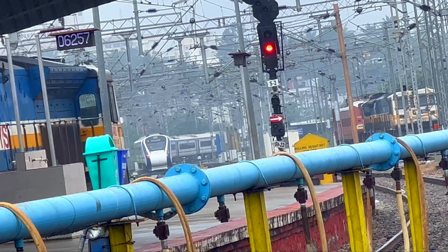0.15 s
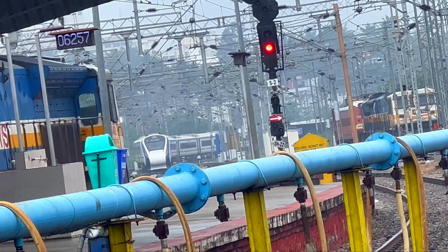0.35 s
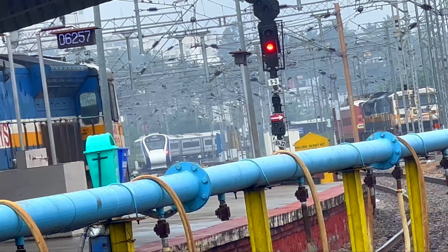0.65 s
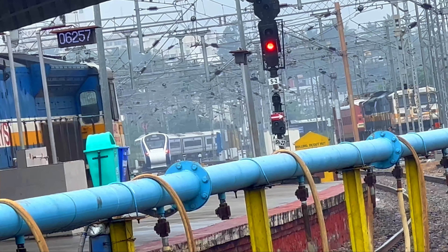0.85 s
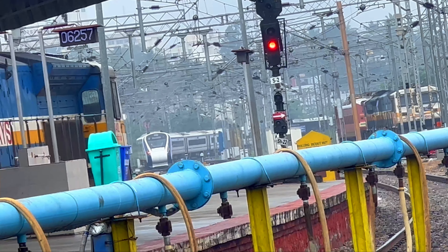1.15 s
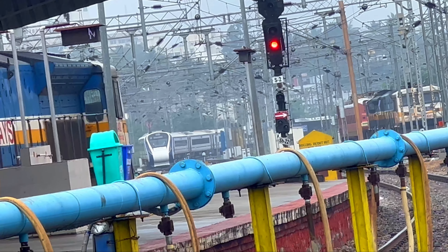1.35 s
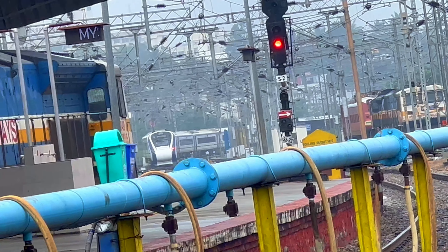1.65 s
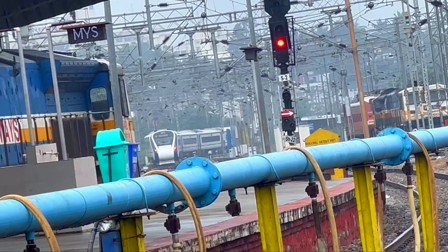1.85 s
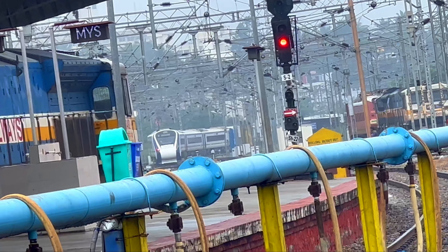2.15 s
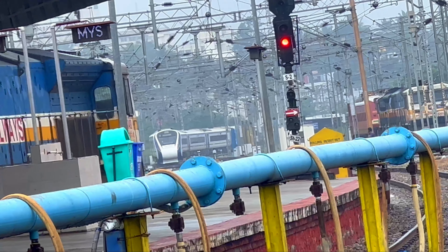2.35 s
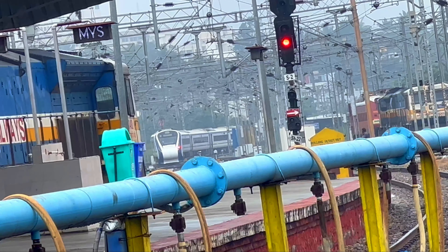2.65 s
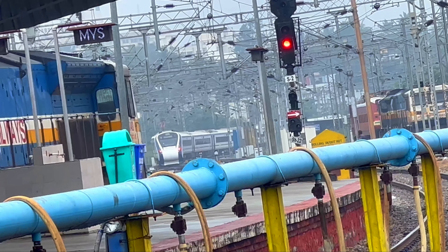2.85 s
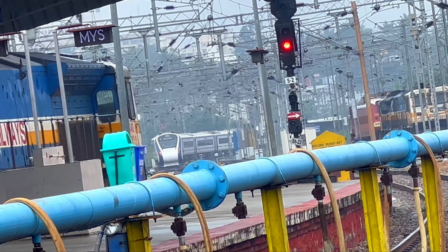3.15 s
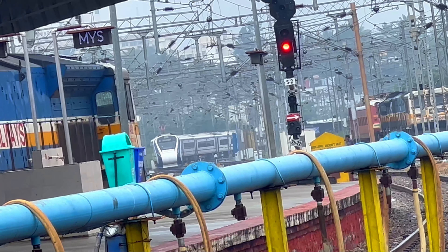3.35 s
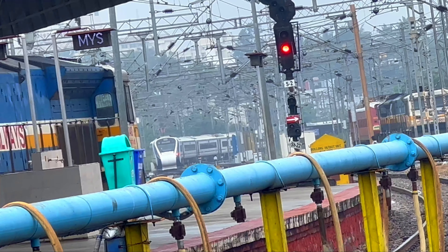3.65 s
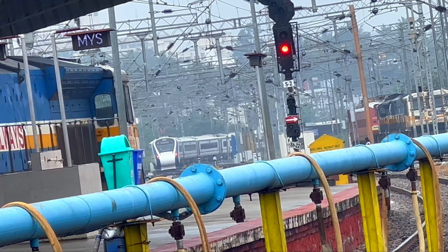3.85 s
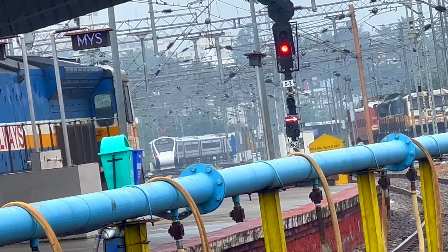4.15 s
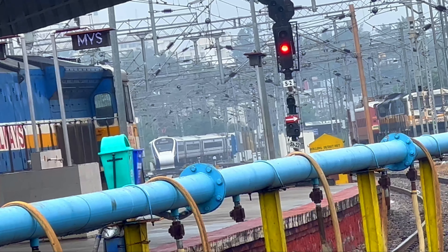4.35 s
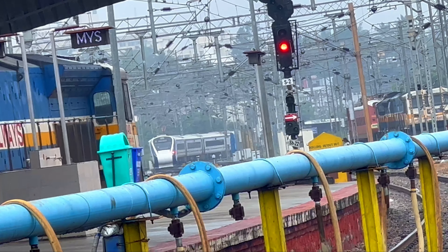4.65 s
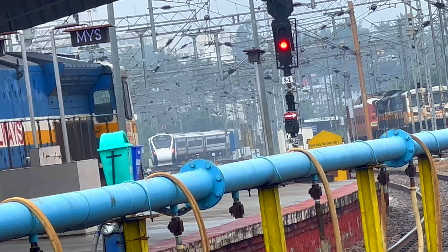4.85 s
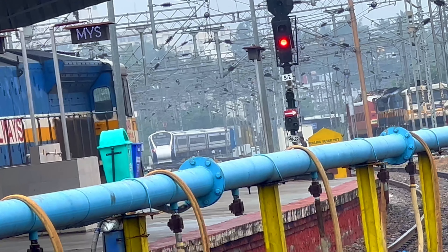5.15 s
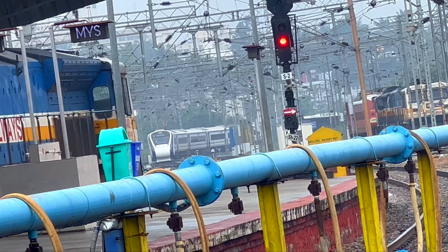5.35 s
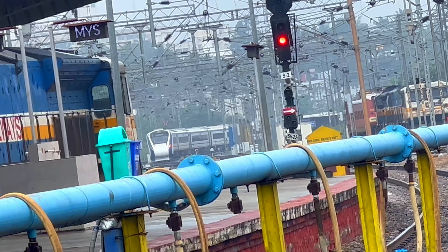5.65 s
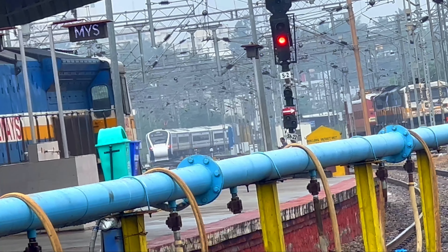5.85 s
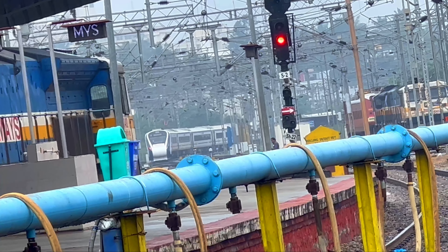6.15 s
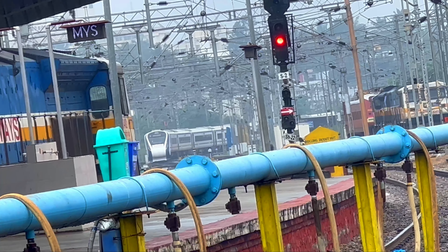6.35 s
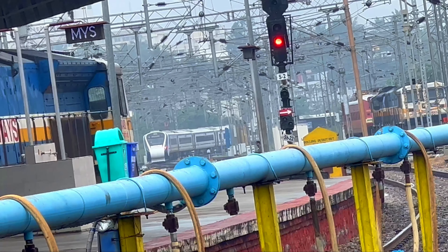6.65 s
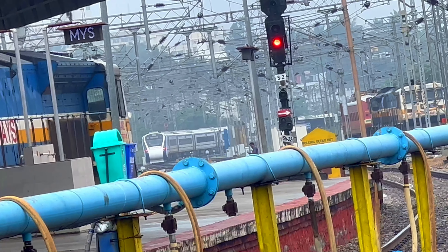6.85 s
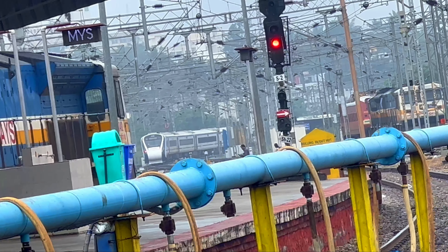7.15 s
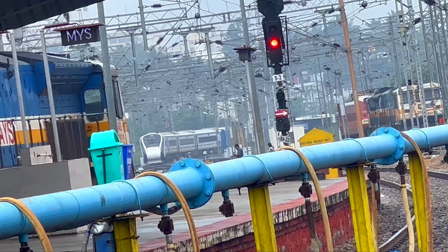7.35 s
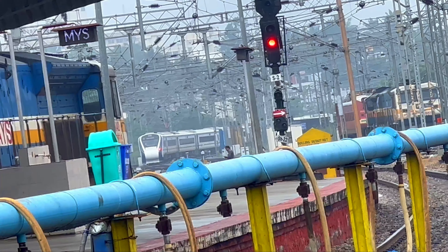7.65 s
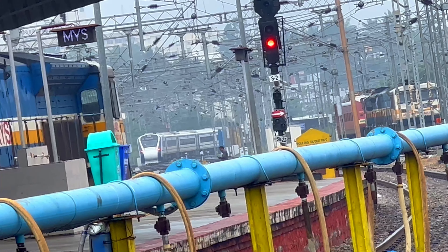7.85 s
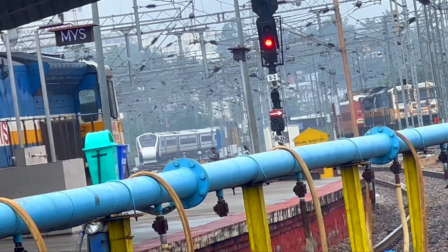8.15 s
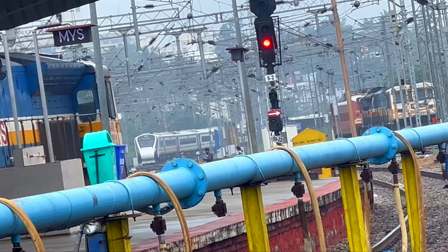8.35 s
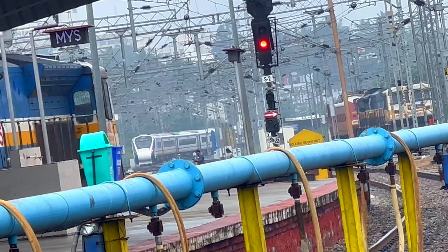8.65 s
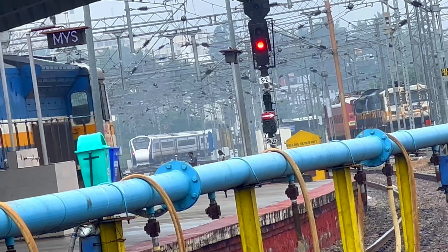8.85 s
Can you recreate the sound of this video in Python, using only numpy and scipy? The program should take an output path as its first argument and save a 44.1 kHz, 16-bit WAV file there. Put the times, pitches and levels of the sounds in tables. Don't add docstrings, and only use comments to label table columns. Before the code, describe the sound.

A steady throbbing low rumble with high machine whines, faint far hisses and a chirp, then a sharp loud air release amid wind buffeting.

```python
import sys
import numpy as np
from scipy import signal
from scipy.fft import rfft, irfft, next_fast_len
from scipy.io import wavfile
from scipy.ndimage import uniform_filter1d, map_coordinates

SR = 44100
rng = np.random.default_rng(int(sys.argv[2]) if len(sys.argv) > 2 else 0)


def to_wav(s):
    ch = np.atleast_2d(s).T
    pcm = np.round(np.clip(ch, -1, 1) * 32767)
    wavfile.write(sys.argv[1], SR, pcm.astype(np.int16))


def boost(x):
    u = np.asarray(x, float) / 20
    return 10 ** u


N = 396459
CYCLE_HZ = 8.575
BEAT_HZ = CYCLE_HZ / 2

# (time [s], change [%])
SPEED = [(0, 0), (5.5, -.05), (6.4, -.3), (6.9, -.85), (7.8, -.7), (9, -.15)]


def unit(x):
    return x / np.sqrt(np.mean(x ** 2) + 1e-20)


def along(points, hz):
    f, v = np.transpose(points)
    return np.interp(np.log(hz + 1), np.log(f + 1), v)


def curves(rows):
    s, *cols = np.transpose(rows)
    return [np.interp(np.arange(N) / SR, s, c) for c in cols]


def wobble(rate):
    knots = rng.standard_normal(int(N * rate / SR) + 4)
    return map_coordinates(knots, [np.arange(N) * rate / SR])


def filtered(x, response):
    m = next_fast_len(N + SR // 2)
    return irfft(rfft(x, m) * response(np.fft.rfftfreq(m, 1 / SR)), m)[..., :N]


def spectrum(points):
    closed = [(points[0][0] / 2, -90), *points, (points[-1][0] * 1.1, -120)]
    return lambda hz: boost(along(closed, hz))


def rush(gain, patchy_db):
    z = signal.stft(rng.standard_normal((2, N)), nperseg=512)[2]
    field = rng.standard_normal(z.shape[1:])
    field = uniform_filter1d(uniform_filter1d(field, size=6, axis=0), size=14, axis=1)
    patchy = signal.istft(z * boost(patchy_db * unit(field)), nperseg=512)[1][:, :N]
    pair = filtered(patchy, gain)
    return pair / np.sqrt(np.mean(pair[0] ** 2))


def flicker(hz, wander_hz, rate):
    turn = np.exp(2j * np.pi * np.cumsum(hz + wander_hz * wobble(7)) / SR)
    paths = [wobble(rate) + 1j * wobble(rate) for _ in range(2)]
    return np.real(turn * [1.29 + 0.79 * paths[0], paths[1]])


def shaft_time():
    return np.cumsum(1 + curves(SPEED)[0] / 100) / SR


def engine():
    # (frequency [Hz], density [dB per Hz])
    rumble = [(13, -47), (22, -12), (38, -7.5), (59, 1.5), (86, 1), (106, -3), (115, -14), (124, -32),
              (162, -43), (200, -26), (260, -51), (440, -120)]
    # (multiple of the beat [1], level [dB])
    orders = [(8, -12), (11, -9), (13, -10), (15, -8), (16, 0), (17, -1.5), (18, -1.5), (19, -1), (21, -3),
              (22, 0), (23, 4), (24, -8)]
    drone_db, order_db, order_sway_db = -29, -8.5, 1.5
    weak_firing_s, dip_db, dip_s, rebound_db = .165, 9, .022, 2.5
    t = shaft_time()
    drone = boost([[-8], [-4.5]]) * rush(spectrum(rumble), patchy_db=.5)
    for multiple, db in orders:
        order_gain = boost(order_db + db + order_sway_db * wobble(1.5))
        drone[0] += order_gain * np.sin(2 * np.pi * (multiple * BEAT_HZ * t + rng.random()))

    power = uniform_filter1d(uniform_filter1d(drone[0] ** 2, size=2400), size=2400)
    level = np.sqrt(np.abs(power))
    since_s = (t - weak_firing_s) % (1 / BEAT_HZ)
    gap = np.exp(-(np.minimum(since_s, 1 / BEAT_HZ - since_s) / dip_s) ** 2)
    throb_db = rebound_db * np.sin(2 * np.pi * BEAT_HZ * since_s) / 2
    throb_db -= dip_db * gap * np.clip(1 + .5 * wobble(3), 0, 2)
    return boost(drone_db + throb_db + .8 * wobble(6)) * drone / (level + 0.14)


def exhaust():
    firings = [1, .1, .55, .25, .8, .05, .45, .2]
    # (multiple of the cycle [1], level [dB])
    duct_orders = [(77, -52), (79, -52), (81, -51.5), (83, -55), (85, -57), (87, -55.5)]
    duct_hz, width_hz, jitter_s = 688, 130, .00012
    shaft = shaft_time()
    count = int(N / SR * CYCLE_HZ * len(firings))
    chance = rng.standard_normal((count, 2))
    firing_s = np.arange(count) / CYCLE_HZ / len(firings) + jitter_s * chance[:, 0]
    at = np.interp(firing_s, shaft, np.arange(N))
    strength = np.resize(firings, count) * boost(1.7 * chance[:, 1])
    pulses = np.bincount(at.astype(int), strength, N)
    duct = lambda f: (1j * f * width_hz / (duct_hz ** 2 - f * f + 1j * f * width_hz)) ** 2
    ring = boost(-52) * unit(filtered(pulses, duct))
    for k, (multiple, db) in enumerate(duct_orders):
        phase = 2 * np.pi * multiple * CYCLE_HZ * shaft + np.pi / 2 * (k % 2) + .3 * wobble(3)
        ring += boost(db + 1.6 * wobble(2.5)) * np.sin(phase)
    return np.array([ring, np.roll(ring, 1500)])


def machines():
    # (frequency [Hz], level [dB], pitch wander [Hz], flicker rate [per s])
    tones = [(339, -57, 1.1, 7), (412, -57, 2.5, 9), (433, -57, 1.5, 9), (1647, -68, 3, 20),
             (1935, -64, 3, 18), (2561, -62, 2.5, 24), (2590, -69, 1.5, 10), (3005, -63, 3, 20),
             (3755, -70, 1.5, 15), (3955, -69, 4, 35), (4861, -82, 8, 25), (7590, -76, 15, 60)]
    # (frequency [Hz], pitch wander [Hz], flicker rate [per s], share of speed change [0-1])
    whine_tones = [(2434, 4, 32, 1), (3797, 4.5, 55, 1), (3992, 3.5, 44, 0)]
    # (level [dB], drift [dB per s])
    whine_levels = [(-60, 0.01), (-58, .25), (-56, -.5)]
    shake_hz, shake_share, beat_shake_share = 6.15, .0022, .0018
    t, shaft = np.arange(N) / SR, shaft_time()
    speed_percent = curves(SPEED)[0]
    out = sum(boost(db) * flicker(hz, wander_hz, rate) for hz, db, wander_hz, rate in tones)
    for (db, drift), (hz, wander_hz, rate, share) in zip(whine_levels, whine_tones):
        beat = np.cos(2 * np.pi * (BEAT_HZ * shaft + rng.random()))
        rock = shake_share * np.cos(2 * np.pi * shake_hz * t - .4) + beat_shake_share * beat
        whine_hz = hz * (1 + share * speed_percent / 100 + rock)
        whine_db = db + 3.26 + drift * t + 1.2 * wobble(4) + .8 * beat
        out += boost(whine_db) * flicker(whine_hz, wander_hz, rate)
    return out


def vents():
    # (frequency [Hz], density [dB per Hz])
    jet = [(400, -17), (800, -4.5), (1500, -3), (3000, 0.5), (6400, 1.5), (8000, -0.5), (9000, -1.5),
           (12000, -7), (13000, -13), (15500, -15)]
    # (time [s], level [dB], dullness [dB per octave])
    blast = [
        (6.42, -74, 0),
        (6.46, -48, 0),
        (6.504, -44, 1),
        (6.53, -36, 3.5),
        (6.574, -34, 3),
        (6.59, -26, .5),
        (6.742, -30.5, 0),
        (6.932, -43, 3.5),
        (7.35, -67, 6),
    ]
    # (peak time [s], level [dB], rise [s], fall [s], dullness [dB per octave])
    far_vents = [(.7, -50.5, .13, .36, 3), (3.09, -62, .05, .06, 3), (3.37, -62, .2, .05, 3),
                 (3.87, -62, .05, .25, 2), (4.43, -48, .36, .25, 2.8), (6.215, -58, .06, .14, 3),
                 (7.72, -58, .06, .09, 3), (7.885, -63, .04, .12, 2)]
    # (time [s], peak level [dB])
    spits = [(7.66, -38), (7.6684, -37), (7.6789, -39), (7.7244, -45)]
    edge_db, rise_curve, fall_curve = 20, 1.8, 1.5
    dulls_per_db = .17
    t = np.arange(N) / SR
    bright = rush(spectrum(jet), patchy_db=1.3) * boost(.9 * wobble(45))
    dull = filtered(bright, lambda hz: np.log2((hz + 1) / 6000) / 8)

    db, tilt = curves(blast)
    is_open = (t > blast[0][0]) * (t < blast[-1][0])
    out = is_open * boost(db + 2.0) * (bright - np.clip(tilt, -3, 6) * dull)

    for s, db, rise_s, fall_s, tilt in far_vents:
        away_s = np.abs(t - s)
        loss_db = edge_db * np.where(t < s, (away_s / rise_s) ** rise_curve, (away_s / fall_s) ** fall_curve)
        dullness = np.clip(tilt + dulls_per_db * loss_db, -3, 5.5)
        out += boost(db + 2.0 - loss_db) * (bright - dullness * dull)

    spit = np.zeros(N)
    for s, db in spits:
        peak_s = s + .003
        slope_s = np.where(t > peak_s, .05, .012)
        spit += boost(db - 7 - 60 * np.abs(t - peak_s) / slope_s)
    band = lambda hz: 1 / (1 + (4500 / (hz + 1)) ** 6) / (1 + (hz / 12500) ** 4)
    return out + spit * filtered(bright, band)


def wind():
    # (peak time [s], flap level [dB], length [s], thump level [dB])
    puffs = [(1.38, -42, .03, -26), (1.507, -36, .025, -34), (2.815, -32, .03, -20), (3.475, -33, .04, -24),
             (3.6, -40, .03, -25), (3.696, -35, .027, -34), (4.06, -42, .03, -25), (4.445, -27, .027, -22),
             (4.625, -29, .045, -18), (4.825, -30.5, .04, -30), (4.868, -28, .03, -25),
             (5.075, -26, .026, -17), (5.161, -22, .05, -19), (5.195, -27.5, .027, -17),
             (5.345, -23.5, .036, -16), (5.385, -26, .026, -21), (5.525, -23, .023, -16),
             (5.611, -24.5, .025, -30), (5.798, -34, .03, -38), (5.961, -36, .03, -28),
             (6.07, -33, .044, -23), (6.203, -9.5, .024, -19), (6.275, -18.5, .037, -12),
             (6.507, -22.5, .027, -18), (8.337, -30.5, .03, -23), (8.433, -32, .03, -25),
             (8.525, -25.5, .06, -26), (8.7, -36, .03, -20), (8.85, -31.5, .03, -28),
             (8.944, -31, .024, -11)]
    flap_top_hz, flap_opens_hz, thump_hz, thump_longer = 170, 185, 76, .8
    out = np.zeros((2, N + SR))
    t = np.arange(-SR // 10, SR // 10) / SR
    hz = np.fft.rfftfreq(len(t), 1 / SR)
    for s, db, length_s, thump_db in puffs:
        top_hz = flap_top_hz + flap_opens_hz * boost(db + 8.5)
        band = 1 / (hz + 60) / (1 + (hz / top_hz) ** 8) / (1 + (105 / (hz + 1)) ** 8)
        noise = irfft(rfft(rng.standard_normal((2, len(t)))) * band, len(t))
        flap = np.exp(-(t / length_s) ** 2 * 2) * noise
        flap = flap / np.abs(flap[0]).max()

        pitch, turn = rng.standard_normal(2)
        phase = 2 * np.pi * thump_hz * (1 + .12 * pitch) * t + 2 * turn + [[0], [np.pi / 2]]
        thump = np.exp(-(t / length_s / thump_longer) ** 2 * 2) * np.cos(phase)
        puff = boost(db - 0.5) * flap * [[1], [1.4]] + boost(thump_db + 0.4) * thump * [[1], [1.6]]
        start = round(s * SR) - len(t) // 2
        out[:, start:start + len(t)] += puff
    return out[:, :N]


def bird():
    # (time [s], length [s], from [Hz], towards [Hz], level [dB])
    chirps = [
        (2.88, .22, 523, 519, -49),
        (3.832, .028, 4700, 5300, -53),
        (3.86, .034, 3700, 3200, -51),
        (4.235, .11, 2800, 3410, -47),
        (4.546, .14, 6800, 3950, -51.5),
    ]
    out, t = np.zeros(N), np.arange(N) / SR
    for s, length_s, from_hz, to_hz, db in chirps:
        u = np.clip((t - s) / length_s, 0, 1)
        hz = to_hz + (from_hz - to_hz) * np.exp(-3.7 * u)
        phase = 2 * np.pi * np.cumsum(hz) / SR
        swell = np.sin(np.pi * u ** .65) ** .8 * (u < 1)
        second = .55 * (hz > 1000) * (hz < 3700) * np.sin(2 * phase)
        out += boost(db + 1.8 * wobble(90)) * swell * (.8 * np.sin(phase) + second)
    return out * np.array([[1], [0]])


def yard():
    # (frequency [Hz], density [dB per Hz])
    roll = [(120, -6.5), (170, -14.5), (300, -13.5), (560, -14), (800, -17), (1100, -22), (1800, -25.5),
            (2300, -27.5), (3000, -29.5), (3600, -31.5), (4200, -32), (4600, -58)]
    # (frequency [Hz], density [dB per Hz])
    far_air = [(3000, -30), (4300, 0.5), (6000, -4.5), (8300, -6), (9500, -11.5), (11500, -21),
               (13500, -30.5), (15500, -30)]
    # (time [s], level [dB])
    leak = [(0, -63), (.55, -63.5), (1.05, -59.5), (4, -59.5), (4.7, -62), (6.4, -63), (7.4, -61.5),
            (9, -63)]
    # (frequency [Hz], width [Hz], level [dB])
    hums = [(690, 75, -47.5), (2082, 56, -57), (1387, 104, -59.5), (210, 29, -60)]
    # (frequency [Hz], depth [0-1])
    beats = [(25.7, .15), (34.3, .5), (42.9, .15)]
    roll_db = -41.6 + .12 * np.arange(N) / SR
    air_db = curves(leak)[0]
    out = boost(roll_db) * rush(spectrum(roll), patchy_db=0.8)
    out += boost(air_db + 0.22 * wobble(9)) * rush(spectrum(far_air), patchy_db=1.4)
    beat = sum(depth * np.cos(2 * np.pi * hz * shaft_time()) for hz, depth in beats)
    for hz, width_hz, db in hums:
        resonance = lambda f: 1 / (1 + ((f - hz) / width_hz * 2) ** 2)
        out += boost(db) * (1 + beat * (hz < 1000)) * rush(resonance, patchy_db=0.1)
    return out


def scene():
    # (frequency [Hz], level [dB])
    diffuse_share = [(40, -18), (90, -17.5), (160, -18), (300, -13.5), (700, -10), (1100, -8.5), (1600, -7),
                     (2100, -13.5), (2450, -15.5), (4000, -18), (5100, -30), (5600, -66), (16000, -63)]
    direct, diffuse = engine() + yard() + machines() + vents() + wind() + bird() + exhaust()
    diffuse = filtered(diffuse, lambda hz: boost(along(diffuse_share, hz)))
    return np.array([direct + diffuse, direct - diffuse])


def wind_filter(x):
    # (from [s], to [s], ramp [s], level [dB])
    bass_cut = (6.76, 6.96, .03, -11)
    start_s, end_s, ramp_s, cut_db = bass_cut
    t = np.arange(N) / SR
    on = np.clip(np.minimum(t - start_s, end_s - t) / ramp_s + 1, 0, 1)
    bass = filtered(x, lambda hz: 1 / (1 + (hz / 125) ** 8))
    return x - (1 - boost(cut_db * on)) * bass


def lead(hz):
    # (frequency [Hz], phase [rad])
    port_phase = [(300, 0), (1200, -.05), (1750, -.22), (2400, 0), (3300, .36), (4800, .3), (5450, 0),
                  (7850, .1)]
    turn_from_hz, quarter_turn_hz, linger = 8250, 1880, .8
    turns = np.maximum(hz - turn_from_hz, 0) / quarter_turn_hz
    drift = turns - linger * np.sin(2 * np.pi * turns) / (2 * np.pi)
    return np.interp(hz, *np.transpose(port_phase)) * (turns == 0) - np.pi / 2 * drift


def band_limit(x):
    return signal.sosfilt(signal.butter(12, 17090, fs=SR, output="sos"), x)


def record(dry):
    # (frequency [Hz], level [dB])
    left_over_right = [(60, -0.6), (600, -1.5), (1500, -1.4), (2400, 0)]
    top_hz, rumble_hz = 15800, 29
    sign = np.array([[1], [-1]])

    def ports(hz):
        band = (hz < top_hz) / (1 + (rumble_hz / (hz + 1)) ** 8)
        return np.exp(1j * sign * lead(hz)) * boost(sign * along(left_over_right, hz) / 2) * band

    mix = filtered(wind_filter(dry), ports)
    return band_limit(mix)


dry = scene()
out = record(dry)
to_wav(out)
```